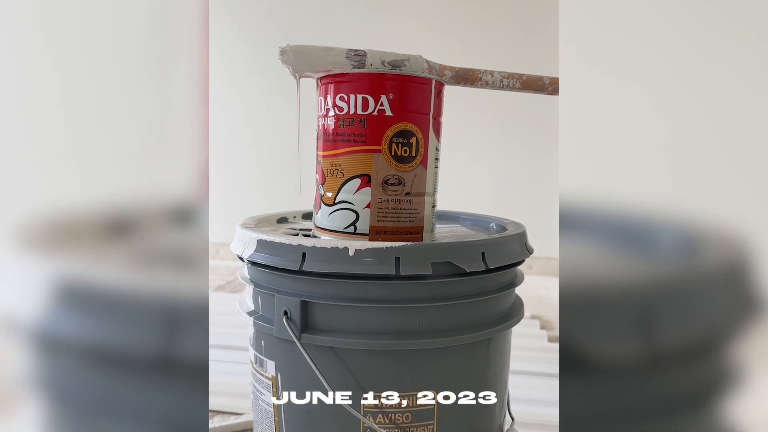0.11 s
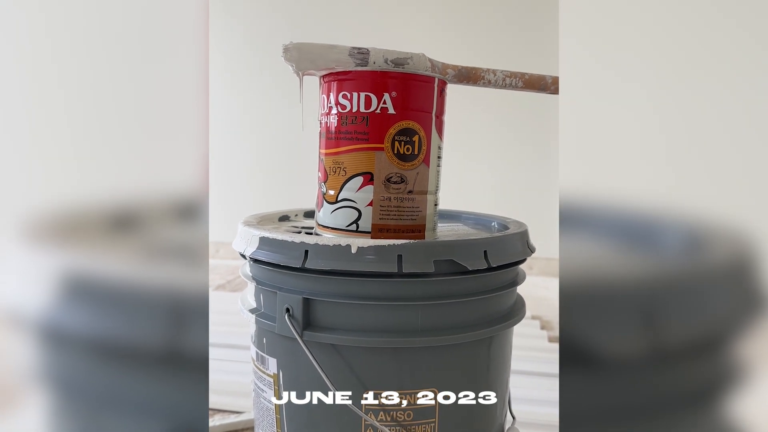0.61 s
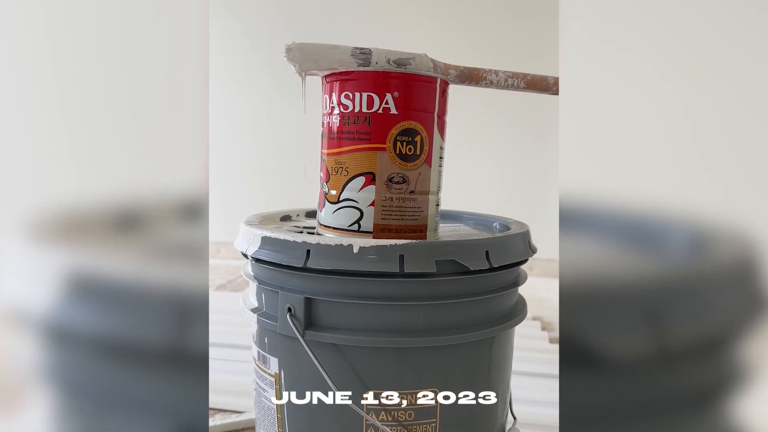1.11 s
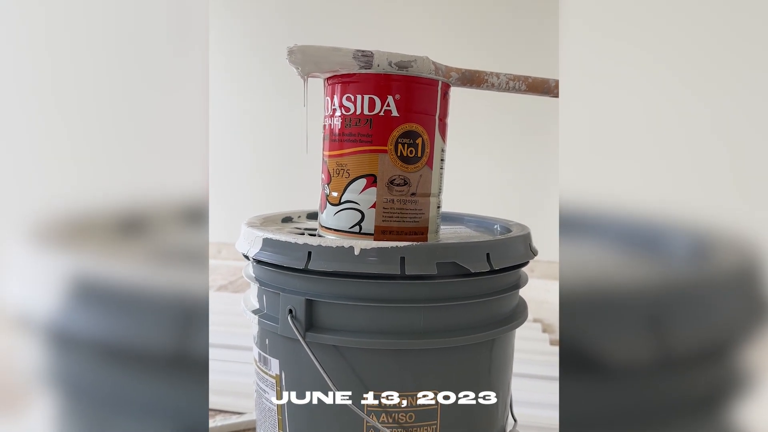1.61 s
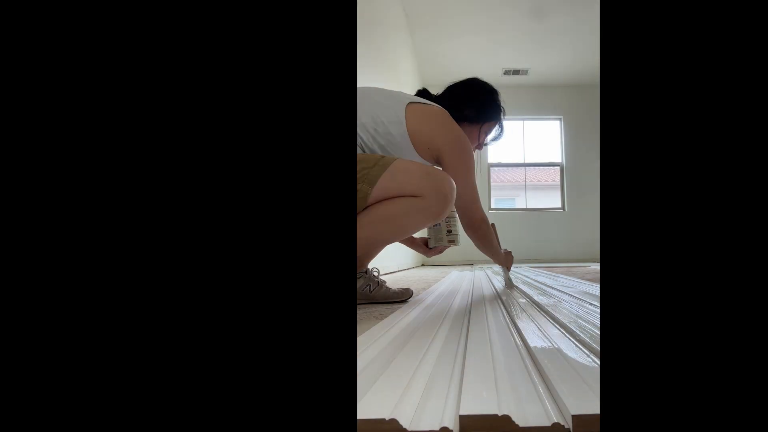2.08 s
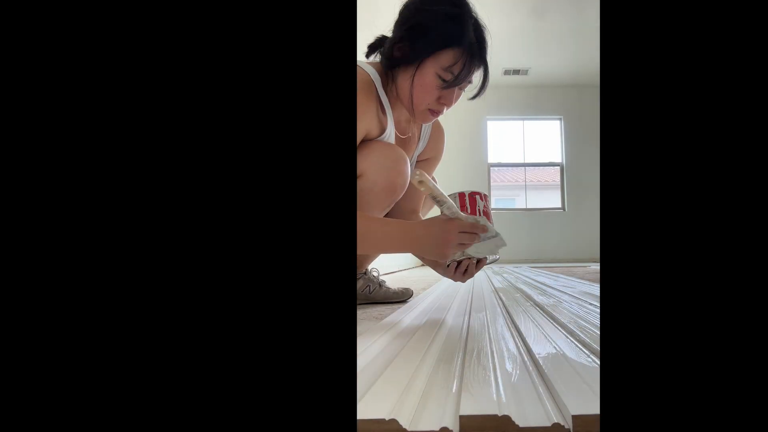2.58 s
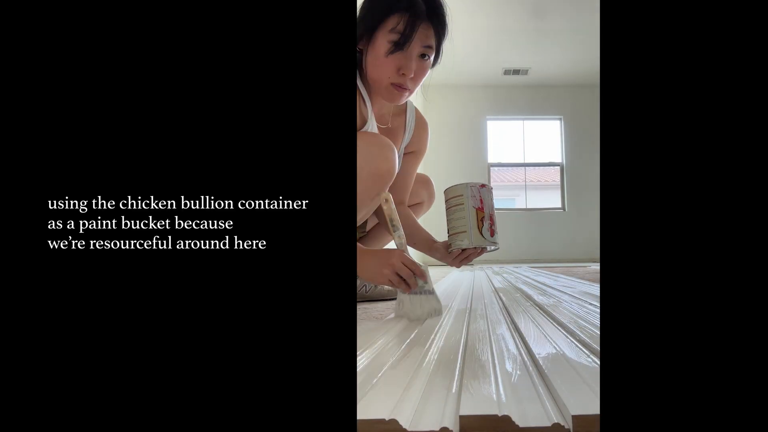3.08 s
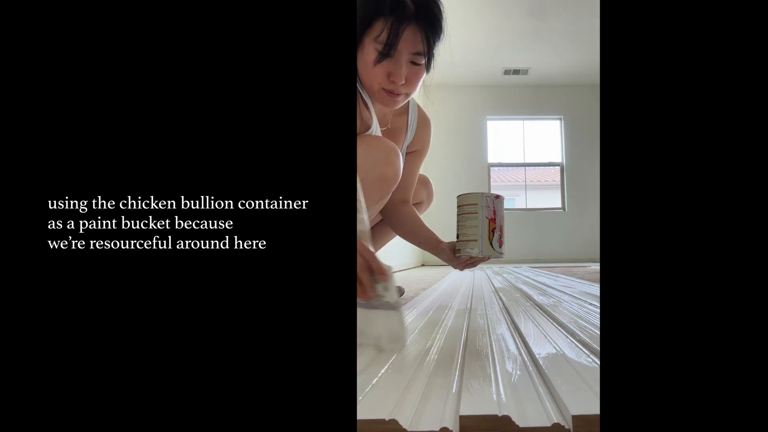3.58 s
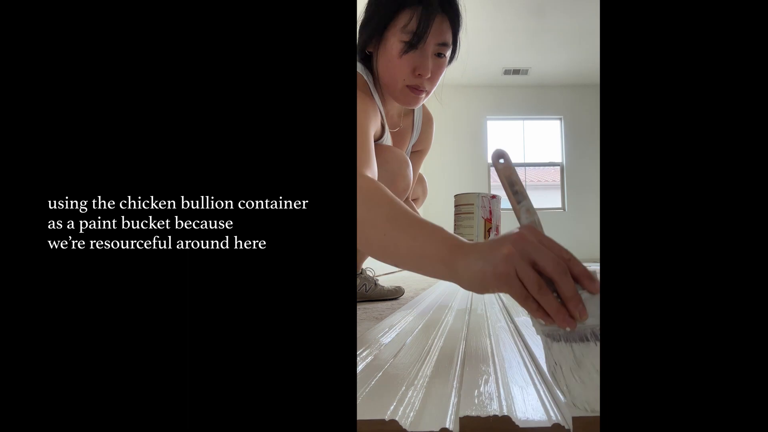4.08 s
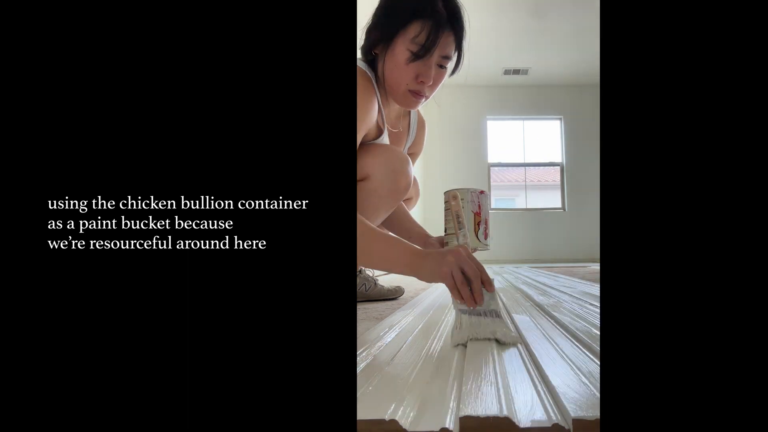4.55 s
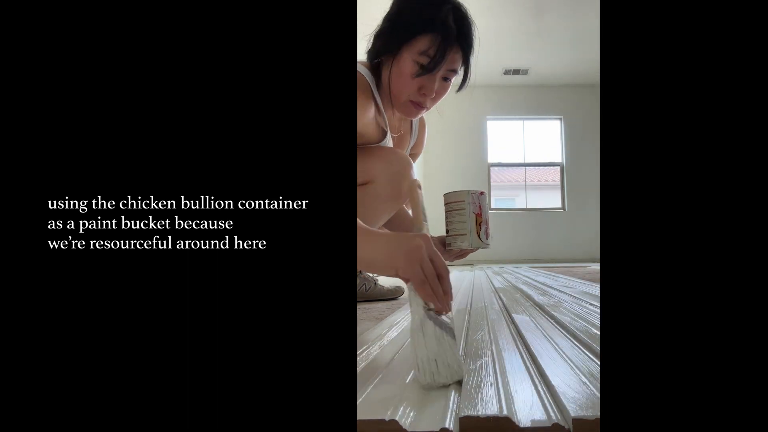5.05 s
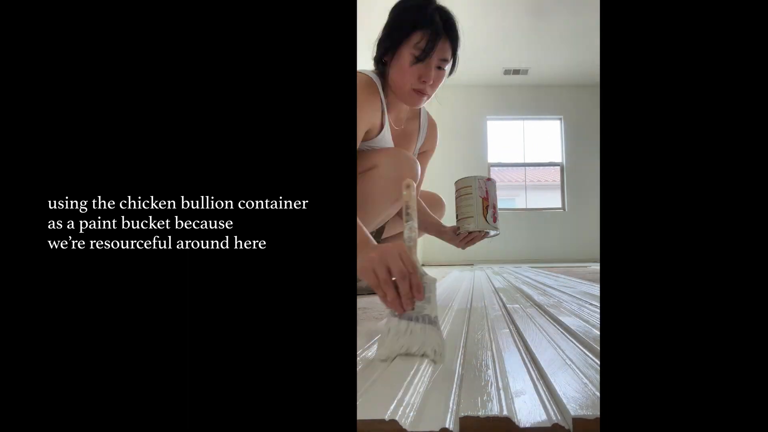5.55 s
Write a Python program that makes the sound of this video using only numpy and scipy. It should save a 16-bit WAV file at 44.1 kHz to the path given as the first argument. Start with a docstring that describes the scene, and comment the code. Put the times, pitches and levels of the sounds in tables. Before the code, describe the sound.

From 0 to 1.9 s there is only a very quiet bare room: wavering air noise, a low fluttering hum and a barely audible, rapid high ticking. At 1.9 s it cuts instantly to a close paintbrush already in mid-stroke on wooden floor strips. Dense, grainy bristle scratch rings hollow in the upper midrange, under airy hiss and sizzle. Strokes peak near 2.0, 2.3, 2.8, 3.2, 3.8, 4.2, 4.7, 5.1 and 5.6 s, sinking at each turn. Those at 3.2, 4.2 and 5.1 s are brighter and stronger; those between are softer on top, with more low shudder. Caught tufts snap in tiny dry clicks, clustered around 3.2 to 3.4 s. Loose strips rumble and knock dully near 2.6, 3.6, 4.5 and 5.0 s, the 3.6 s knock strongest. The last, duller stroke is fading at the end. Close stereo pickup, slight room reflection.

```python
"""First a quiet bare room: air noise over a low, fluttering hum and a faint high ticking.
Then at once, in mid-stroke, a paintbrush close by goes to and fro along wooden strips on the floor.
Bristles slip in dense random grains, and two air spaces under the wood ring near 2.3 kHz. Caught tufts
snap free; the strips rumble, boom and knock. Two microphone ports hear the brush with a lag."""
import sys
import numpy as np
from scipy import signal
from scipy.fft import rfft, irfft
from scipy.io import wavfile

SR = 44100
rng = np.random.default_rng(int(sys.argv[2]) if len(sys.argv) > 2 else 0)


def linear_from_db(decibels):
    """Turn decibels (scalar or array-like) into linear amplitude factors; 0 gives 1."""
    return 10 ** (np.asarray(decibels, float) / 20)


def pcm_store(signal):
    """Save signal as 16-bit PCM."""
    levels = np.round(np.clip(np.atleast_2d(signal), -1, 1) * 32767)
    wavfile.write(sys.argv[1], SR, levels.astype(np.int16).T)


N = 250047
TIME_S = np.arange(N) / SR
HZ = np.maximum(np.fft.rfftfreq(N, 1 / SR), 1)
BRUSH_START_S = 1.906


def rms_one(x):
    """Scaled so that the mean of the channels has rms 1."""
    return x / np.sqrt(np.mean(np.mean(np.atleast_2d(x), axis=0) ** 2) + 1e-20)


def over_hz(points):
    """Reads a spectrum table at every frequency bin, along a logarithmic pitch scale."""
    hz, value = np.transpose(points)
    return np.interp(np.log(HZ), np.log(np.maximum(hz, 1)), value)


def coloured(x, gain):
    """Filters by one gain for each frequency bin."""
    return irfft(rfft(x) * gain, N)


def drift(rate_hz):
    """Slow random wandering with rms 1; a higher rate wanders faster."""
    return rms_one(coloured(rng.standard_normal(N), 1 / (1 + (HZ / rate_hz) ** 2)))


def clicks(rows):
    """One single-sample click for each (start_s, level_db) row."""
    out = np.zeros(N)
    for start_s, level_db in rows:
        out[round(start_s * SR)] = linear_from_db(level_db)
    return out + 1e-18


def ring(x, hz, t60_s):
    """A unit click sets off a sine of height 1 that dies by 60 dB in t60_s."""
    radius = linear_from_db(-60 / (t60_s * SR))
    angle = 2 * np.pi * hz / SR
    return signal.lfilter([0, np.sin(angle)], [1, -2 * radius * np.cos(angle), radius * radius], x)


def arches(turn_s, turn_db, top_s, top_db, rise, fall):
    """A level that climbs from each turn to the top of its stroke and sinks to the next turn."""
    out = np.zeros(N)
    for a, b, a_db, b_db, s, db in zip(turn_s, turn_s[1:], turn_db, turn_db[1:], top_s, top_db):
        up = db - (db - a_db) * np.clip((s - TIME_S) / (s - a), 0, 1) ** rise
        down = db - (db - b_db) * np.clip((TIME_S - s) / (b - s), 0, 1) ** fall
        arch = np.where(TIME_S < s, up, down)
        out = np.where(TIME_S >= a, arch, out)
    return out


def swells(rows, rest):
    """Gain over time: (top_s, level_db, rise_s, die_s) bumps added in power to a resting gain."""
    power = rest ** 2
    for top_s, level_db, rise_s, die_s in rows:
        width_s = np.where(TIME_S < top_s, rise_s, die_s)
        power = power + linear_from_db(level_db) ** 2 * np.exp(-2 * ((TIME_S - top_s) / width_s) ** 2)
    return np.sqrt(power)


# room noise, sum of the two ports: pitch_hz, level_db (per Hz)
ROOM_SUM = [(18, -47), (30, -10.5), (60, -2.5), (80, -9.5), (115, 0.5), (150, -15), (195, -11.5),
            (390, -22.5), (900, -21), (2300, -28.5), (2900, -40), (4900, -46), (6000, -40), (9500, -47),
            (11000, -61)]
# room noise, difference of the two ports: pitch_hz, level_db (per Hz)
ROOM_DIFFERENCE = [(30, -36), (100, -1.5), (280, -4), (900, -1), (1600, -16.5), (2600, -24), (4200, -30),
                   (5400, -28), (6300, -37), (7400, -28.5), (12600, -33), (13000, -47), (14800, -42),
                   (15200, -24)]
ROOM_SUM_DB, ROOM_DIFFERENCE_DB = -66, -73
HUM_TOP_HZ = 250.0


def room_tone():
    """Air noise that wavers slowly over a low noisy hum that flutters faster."""
    mid, side = rng.standard_normal((2, N))
    mid = rms_one(coloured(mid, linear_from_db(over_hz(ROOM_SUM))))
    hum = coloured(mid, 1 / (1 + (HZ / HUM_TOP_HZ) ** 4))
    air = mid - hum
    mid = linear_from_db(ROOM_SUM_DB) * (air * linear_from_db(0.98 * drift(1.7)) + hum * linear_from_db(2.2 * drift(7.3)))
    side = linear_from_db(ROOM_DIFFERENCE_DB) * rms_one(coloured(side, linear_from_db(over_hz(ROOM_DIFFERENCE))))
    return mid + side * [[1], [-1]]


TICK_HZ, TICK_DB, TICKS_PER_S = 7750, -99.0, 30


def ticking():
    """Faint 7 ms pulses of a high tone at a steady rate, of uneven strength."""
    beat = np.diff(np.floor(np.arange(N + 1) * TICKS_PER_S / SR))
    strength = rng.choice([-1, 1], N) * linear_from_db(1.6 * drift(9.1))
    pulse = np.convolve(beat * strength, np.hanning(round(.007 * SR)), "same")
    return linear_from_db(TICK_DB) * rms_one(pulse * np.sin(2 * np.pi * TICK_HZ * TIME_S))


# how far the left port leads the right; they oppose near 8 kHz and agree again near 13 kHz:
# pitch_hz, lead_radians
PORT_PHASE = [(600, 0), (3300, .4), (4600, .3), (6400, -1.4), (7300, -2.5), (7650, -np.pi), (8750, -np.pi),
              (9100, -3.9), (11500, -5.4), (11900, -2 * np.pi), (14300, -2 * np.pi), (14600, -7.3),
              (15800, -8.3)]
# loudness of the left port over the right: pitch_hz, left_minus_right_db
PORT_BALANCE = [(60, 0.0), (110, 0.0), (200, 0.0), (380, 0.0), (700, -3.5), (1290, -3.5), (2380, -1.5),
                (4400, -0.5), (8120, 0.5), (15000, 0.0)]
# share of the power that reaches both ports directly, the rest comes off the walls: pitch_hz, share (0-1)
DIRECT_SHARE = [(40, 0.97), (130, 1), (290, 0.93), (640, .3), (1400, 0.51), (2400, 1), (4500, 0.31),
                (6500, 0.95), (7400, 1)]
ALIKE_ABOVE_HZ = 7400   # from here up all sound is direct and equally loud at both ports


def ports(direct, walls):
    """Direct sound lags between the two ports; wall sound is unrelated left and right."""
    below = HZ < ALIKE_ABOVE_HZ
    share = np.where(below, np.clip(over_hz(DIRECT_SHARE), 0, 1), 1)
    lean = linear_from_db(over_hz(PORT_BALANCE) * below / 2)
    left = lean * np.exp(.5j * over_hz(PORT_PHASE))
    direct_part = np.sqrt(share) * rfft(direct) * [left, 1 / left]
    wall_part = np.sqrt(1 - share) * rfft(walls) * [lean, 1 / lean]
    return irfft(direct_part + wall_part, N)


# the brush turns round; speed is given by its sizzle, pressure by the ring of the hollow:
# slowest_s, speed_db, lightest_s, pressure_db
TURNS = [(1.72, -58, 1.4, -42), (2.17, -63.5, 2.2, -45), (2.58, -71, 2.54, -51),
         (2.973, -62.5, 2.98, -50.5), (3.525, -70, 3.5, -51.5), (3.996, -66.5, 3.97, -50.5),
         (4.44, -75.5, 4.44, -52), (4.91, -66.5, 4.91, -48.5), (5.385, -68.5, 5.39, -48),
         (5.85, -64, 5.9, -48)]
# one stroke between each two turns; dryness is extra hiss:
# fastest_s, speed_db, hardest_s, pressure_db, dryness_db
STROKES = [(2.0, -52, 2.05, -40.5, -1.5), (2.34, -51, 2.33, -40, -1), (2.8, -54.5, 2.71, -40.5, -0.5),
           (3.22, -49.5, 3.27, -38.5, 1), (3.82, -54.5, 3.78, -41.5, -0.85), (4.16, -49.5, 4.19, -38, 0.86),
           (4.66, -54.5, 4.67, -39.5, 0), (5.09, -48.5, 5.09, -36, -0.15), (5.58, -58, 5.66, -40, 0)]
SPEED_RISE, SPEED_FALL = 2.7, 2.27   # roundness of the arch up to its top and down from it
MEAN_SPEED_DB = -56


def speed():
    """Speed of the brush over time, as the level in dB of its sizzle."""
    slow_s, slow_db = np.transpose(TURNS)[:2]
    fast_s, fast_db = np.transpose(STROKES)[:2]
    return arches(slow_s, slow_db, fast_s, fast_db, SPEED_RISE, SPEED_FALL)


# the strips shudder as the brush is pushed into a new stroke: top_s, level_db, die_s
SHUDDERS = [(2.21, -57, 0.048), (2.29, -58, 0.062), (2.63, -58, .1), (3.0, -59, 0.08), (3.59, -51, .1),
            (3.75, -55, 0.11), (4.08, -67, .08), (4.48, -57, 0.04), (4.57, -51, 0.13), (4.985, -53, 0.1),
            (5.24, -62, 0.022), (5.56, -54.5, 0.23)]
# the floor booms as weight shifts: top_s, level_db, die_s
BOOMS = [(2.34, -60, .08), (2.67, -57, .03), (2.76, -60, .09), (3.62, -61, .03), (3.68, -52.5, 0.098),
         (4.47, -61, .04), (4.57, -70, .08), (4.87, -61, .05), (4.93, -59, .05), (5.09, -62, .07),
         (5.45, -63, .05)]
# colour of the low noise: pitch_hz, level_db (per Hz)
RUMBLE_COLOUR = [(24, -18), (40, -15), (60, 7), (85, -3), (120, 3), (200, -1.5), (300, -9.5), (600, -27.5)]
# brush set down on a loose strip, before the level of each mode is added: start_s, level_db
KNOCKS = [(2.618, -51), (3.591, -36.5), (3.613, -38), (4.466, -44.5), (4.57, -39.5), (4.979, -42)]
# low modes of a strip, before a cut of 12 dB: pitch_hz, level_db, t60_s
STRIP_MODES = [(62, -20, .15), (123, -0.5, 0.18), (207, 6.5, 0.03), (355, 3, 0.046), (716, 6.5, 0.03)]
SHUDDER_REST_DB, BOOM_REST_DB = -63, -68.5   # between events, at mean speed
SHUDDER_BY_SPEED = 0.24   # dB per dB: the resting rumble sinks as the brush slows
SWELL_SHARE = 0.37   # rise time as a share of the dying time
BOOM_TOP_HZ = 90


def strips():
    """Lumpy low noise that shudders and booms, and knocks that ring the low modes of the wood."""
    shudder_rest = linear_from_db(SHUDDER_REST_DB + SHUDDER_BY_SPEED * (speed() - MEAN_SPEED_DB))
    shudder_gain = swells([(s, db, SWELL_SHARE * die, die) for s, db, die in SHUDDERS], shudder_rest)
    boom_gain = swells([(s, db, SWELL_SHARE * die, die) for s, db, die in BOOMS], linear_from_db(BOOM_REST_DB))
    noise = ports(rng.standard_normal(N), rng.standard_normal((2, N))) * linear_from_db(1.0 * drift(18.0))
    noise = coloured(noise, linear_from_db(over_hz(RUMBLE_COLOUR)))
    boom = coloured(noise, 1 / (1 + (HZ / BOOM_TOP_HZ) ** 8))
    knocks = sum(linear_from_db(db - 12.0) * ring(clicks(KNOCKS), hz, t60_s) for hz, db, t60_s in STRIP_MODES)
    return boom_gain * rms_one(boom) + shudder_gain * rms_one(noise - boom) + knocks


HOLLOW_HZ, HOLLOW_WIDTH_HZ = (2263, 2397), 512   # two coupled air spaces under the strips
HOLLOW_DB = 14   # boost of the ring before it joins the scratch
# tufts that catch and let go, before a cut of 3 dB: start_s, level_db
SNAGS = [(1.9354, -24), (1.9852, -27), (2.031, -27.5), (2.261, -31), (2.3943, -24.5), (2.47, -29.5),
         (2.6977, -27), (3.0958, -29.5), (3.2247, -26), (3.3015, -21.5), (3.3491, -24), (3.37, -27),
         (3.41, -30), (3.7991, -31), (4.065, -29), (4.1479, -24), (4.313, -34), (4.637, -26), (4.822, -34),
         (5.0615, -29), (5.1194, -24.5), (5.1804, -33), (5.2227, -31)]


def snags():
    """A caught tuft lets go in about a fifth of a millisecond and rings the hollow."""
    push = np.convolve(clicks(SNAGS) * rng.choice([-1, 1], N), np.hanning(9) / 3)[:N]
    return ports(linear_from_db(-3) * ring(push, np.mean(HOLLOW_HZ), .012), np.zeros((2, N)))


def slips(per_s, spread_db, patchy_db):
    """Bristles let go at random, a few much harder than the rest; the pressure wavers."""
    sizes = linear_from_db(spread_db * np.minimum(rng.exponential(1, N), 3.5)) * rng.choice([-1, 1], N)
    born = rng.random(N) < per_s / SR
    waver = linear_from_db(patchy_db * (drift(40.0) + 0.18 * drift(3.4)))
    return rms_one(sizes * born * waver)


def hollow(x):
    """The scratch plus the ring of the air under the strips, two resonances one after the other."""
    radius = np.exp(-np.pi * HOLLOW_WIDTH_HZ / SR)
    rung = x
    for hz in HOLLOW_HZ:
        b = [(1 - radius ** 2) / 2, 0, (radius ** 2 - 1) / 2]
        a = [1, -2 * radius * np.cos(2 * np.pi * hz / SR), radius ** 2]
        rung = signal.lfilter(b, a, rung)
    return x + linear_from_db(HOLLOW_DB) * rung


# strips that the bristles set humming now and then: pitch_hz
WOOD_TONES_HZ = [216, 318, 420, 519, 673, 855, 1052]


def wood_tones(x):
    """Each tone of the strips comes and goes on its own as the brush moves along."""
    return rms_one(sum(rms_one(ring(x, hz, 0.11)) * linear_from_db(10.6 * drift(16.0)) for hz in WOOD_TONES_HZ))


# colour of the scratch, applied on top of the hollow's ring: pitch_hz, level_db (per Hz)
SCRATCH_COLOUR = [(250, -3.5), (700, -2.5), (1200, -4), (1800, 5.5), (2400, -0.5), (3000, 7), (3900, 0),
                  (4700, -0.5), (6300, -2.5), (8000, -4), (10300, -12), (12500, -11.5), (16000, -15)]
# borders between rustle, ring, hiss and sizzle: pitch_hz
SPLITS_HZ = (1700, 3300, 8300)
# early in a stroke the bent bristles flip over and bite all at once: top_s, level_db (of the hollow ring)
BITES = [(1.906, -41.5), (2.632, -60), (3.0, -47.5), (3.637, -40), (4.025, -44), (4.546, -40),
         (4.958, -40.5), (5.451, -42)]
BITE_RISE_S, BITE_EASE_S = .002, 0.055
SNAG_SURGE_DB, SNAG_BUILD_S, SNAG_EASE_S = -14, 0.0059, 0.024   # slips crowd round a snag
PRESS_RISE, PRESS_FALL, MEAN_PRESS_DB = 1.64, 1.58, -41
# levels at mean speed and pressure, then dB per dB of change
RUSTLE_DB, RUSTLE_BY_SPEED, RUSTLE_BY_PRESS = -53, 0.15, 0.39   # wood rustle follows pressure most
RUSTLE_BY_DRYNESS = -0.53   # wetter strokes drag the wood more
HISS_DB, HISS_BY_SPEED, HISS_BY_PRESS = -50.5, 0.59, 0.17   # bristle hiss follows speed most
HISS_REST_DB, RUSTLE_REST_DB = -67, -68   # what lingers in the room while the brush turns
DRY_ABOVE_HZ, DRY_BRIGHTENS = 5300, .8   # a drier stroke hisses brighter still above this


def brush():
    """Slips ring in the hollow; speed and pressure of the stroke set ring, rustle, hiss and sizzle."""
    # the motion of the hand
    light_s, light_db = np.transpose(TURNS)[2:]
    fast_s, _, hard_s, hard_db, dry_db = np.transpose(STROKES)
    speed_db = speed()
    press_db = arches(light_s, light_db, hard_s, hard_db, PRESS_RISE, PRESS_FALL)
    surges = [(s, db + SNAG_SURGE_DB, SNAG_BUILD_S, SNAG_EASE_S) for s, db in SNAGS]
    bites = [(s, db, BITE_RISE_S, BITE_EASE_S) for s, db in BITES]
    press = swells(surges + bites, linear_from_db(press_db + 0.29 * drift(16.0)))
    faster = speed_db - MEAN_SPEED_DB
    harder = 20 * np.log10(press) - MEAN_PRESS_DB
    drier = np.interp(TIME_S, fast_s, dry_db)
    rustle_db = RUSTLE_DB + RUSTLE_BY_SPEED * faster + RUSTLE_BY_PRESS * harder + RUSTLE_BY_DRYNESS * drier
    hiss_db = HISS_DB + HISS_BY_SPEED * faster + HISS_BY_PRESS * harder + drier

    # the raw scratch, then its four bands from low to high
    direct = slips(per_s=9000.0, spread_db=2.0, patchy_db=0.71)
    scratch = ports(hollow(direct), hollow(rng.standard_normal((2, N))))
    scratch = coloured(scratch, linear_from_db(over_hz(SCRATCH_COLOUR)) / (1 + (280 / HZ) ** 4))
    low, middle, high = [1 / (1 + (HZ / hz) ** 12) for hz in SPLITS_HZ]   # all below each border
    rustle = rms_one(coloured(scratch, low))
    rustle = rms_one(rustle + linear_from_db(-12.0) * wood_tones(rustle))
    hollow_ring = rms_one(coloured(scratch, middle - low))
    hiss = rms_one(coloured(scratch, high - middle))
    hiss_top = coloured(hiss, 1 / (1 + (DRY_ABOVE_HZ / HZ) ** 8))
    hiss = hiss + (linear_from_db(DRY_BRIGHTENS * drier) - 1) * hiss_top
    sizzle = rms_one(coloured(scratch, 1 - high))

    out = np.hypot(linear_from_db(rustle_db), linear_from_db(RUSTLE_REST_DB)) * rustle
    out += press * hollow_ring
    out += np.hypot(linear_from_db(hiss_db + 1.0 * drift(6.6)), linear_from_db(HISS_REST_DB)) * hiss
    return out + linear_from_db(speed_db + 0.5 * drift(6.2)) * sizzle


def scene():
    """The still room, then in its place the work close by."""
    close = np.clip((TIME_S - BRUSH_START_S) / .0003, 0, 1)   # a 0.3 ms crossfade
    return (1 - close) * (room_tone() + ticking()) + close * (brush() + snags() + strips())


def low_pass(x):
    """Removes everything above the highest recorded frequency."""
    return signal.sosfilt(signal.butter(12, 16460, fs=SR, output="sos"), x)


CUTOFF_HZ, BASS_CUT_HZ = 15850, 42


def record(dry):
    """The microphone drops the deep bass, and the top is cut."""
    top = np.clip((CUTOFF_HZ - HZ) / 150, 0, 1)
    bass = 1 / np.sqrt(1 + (BASS_CUT_HZ / HZ) ** 6)
    mix = coloured(dry, top * bass)
    return low_pass(mix)


dry = scene()
out = record(dry)
pcm_store(out)
```